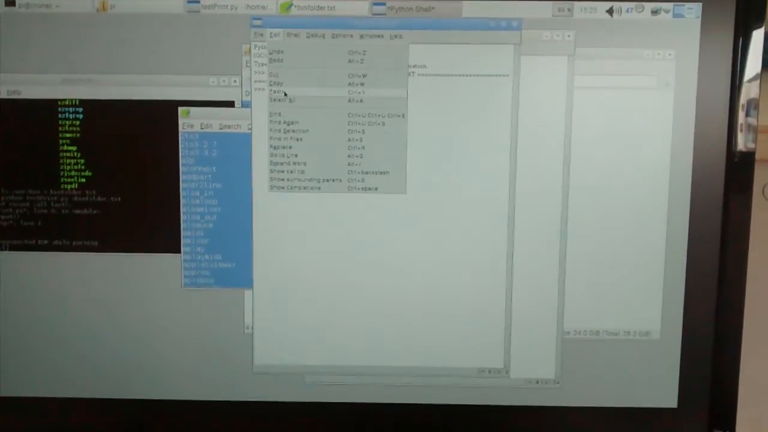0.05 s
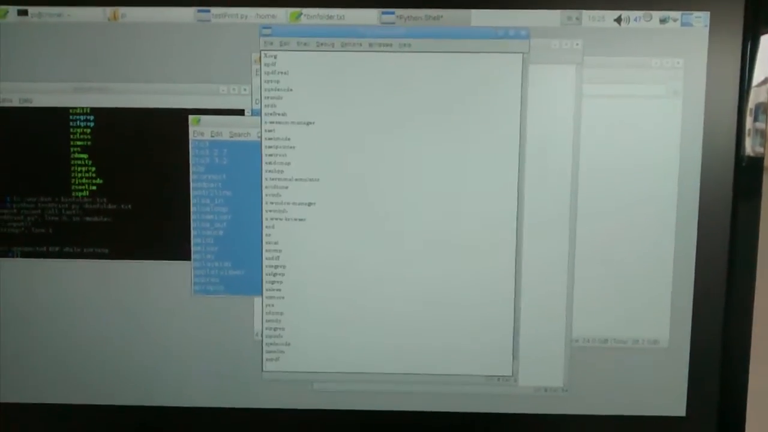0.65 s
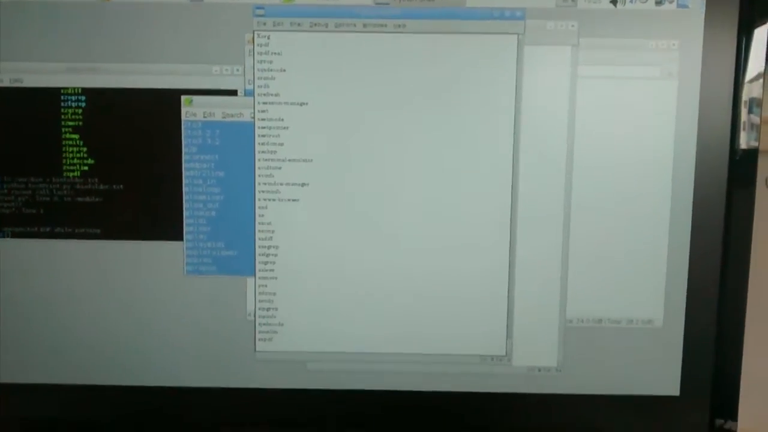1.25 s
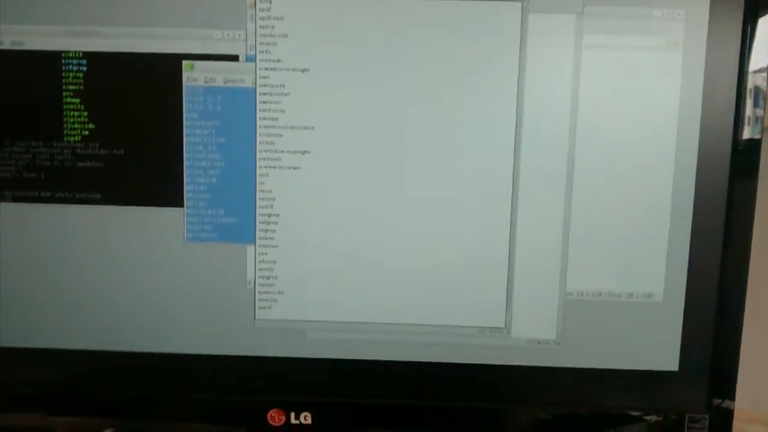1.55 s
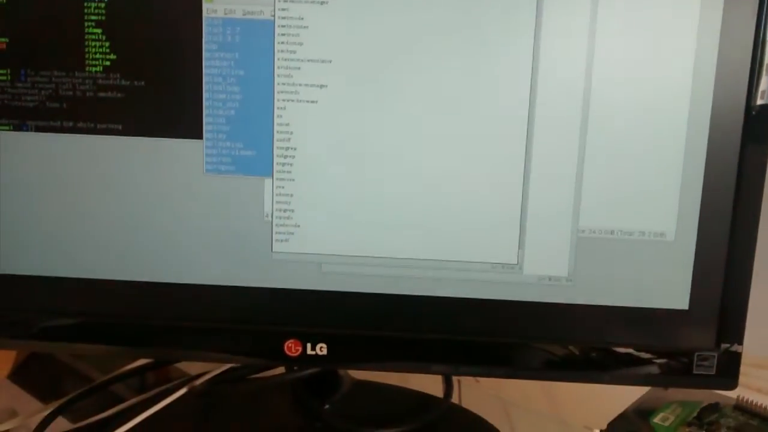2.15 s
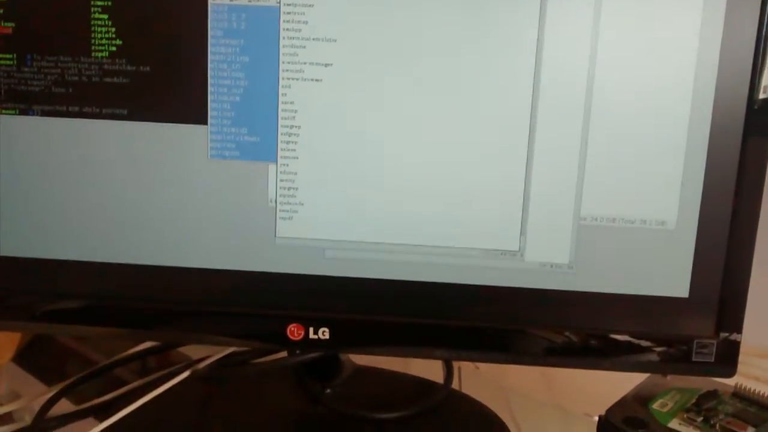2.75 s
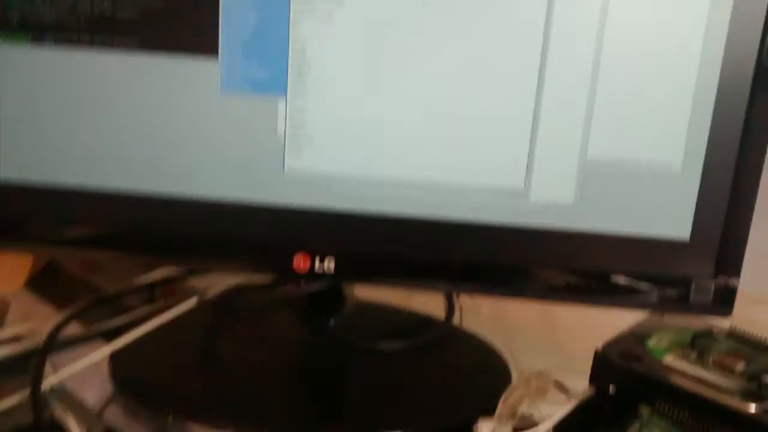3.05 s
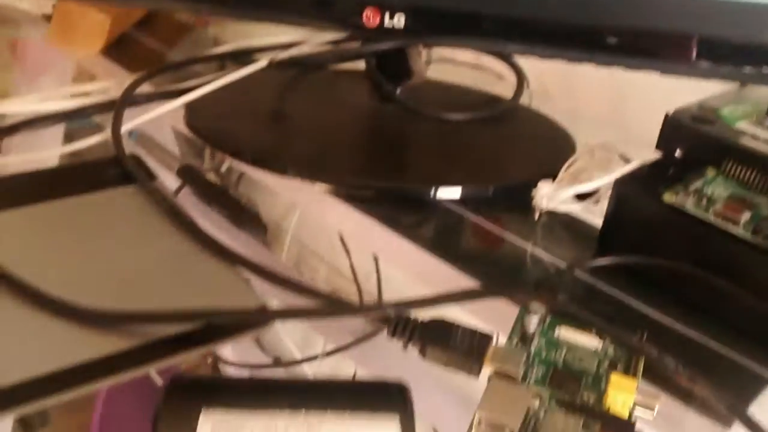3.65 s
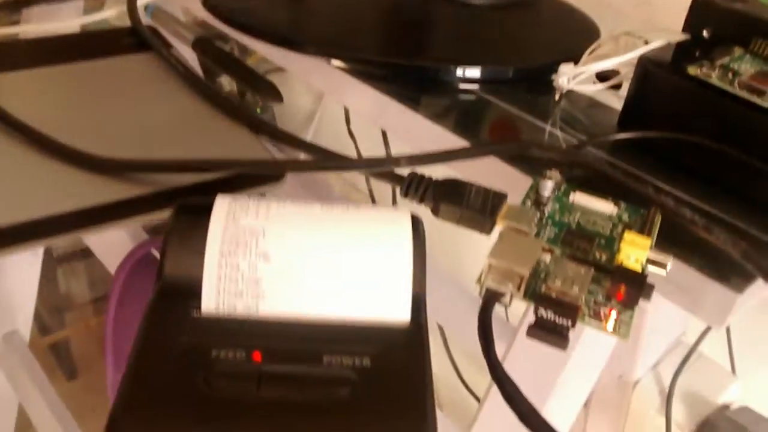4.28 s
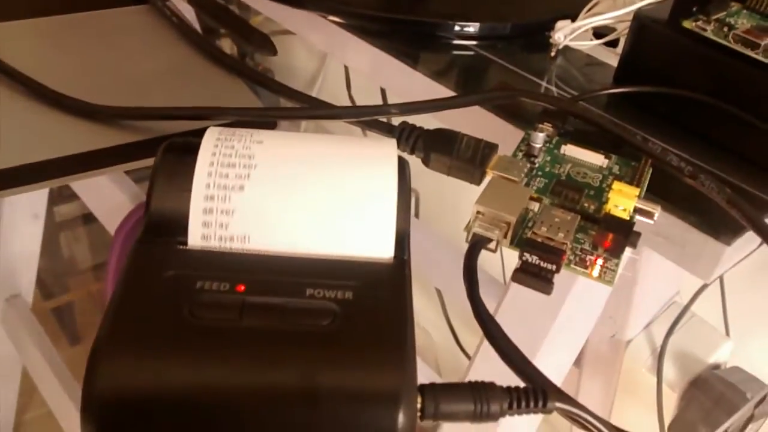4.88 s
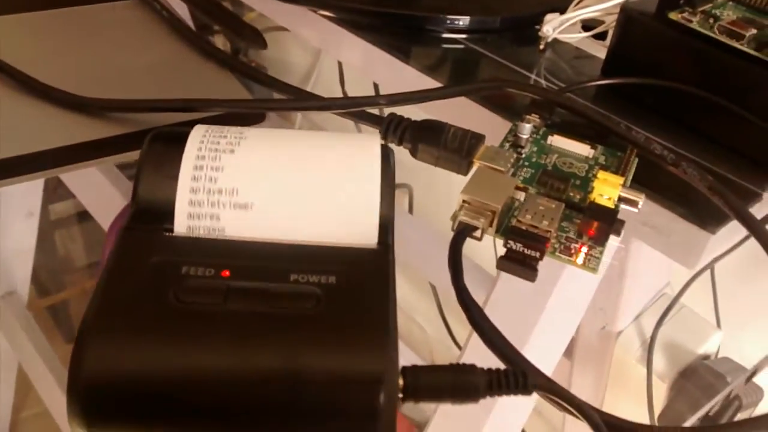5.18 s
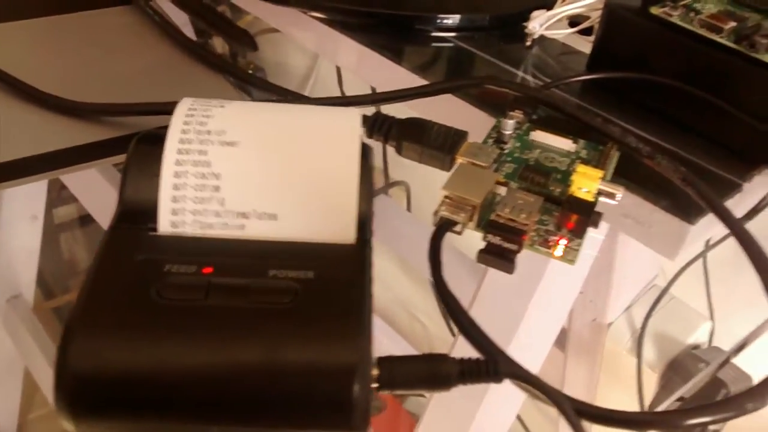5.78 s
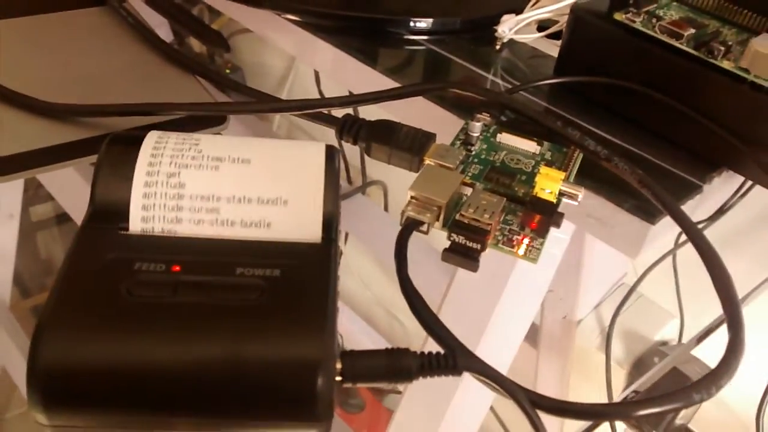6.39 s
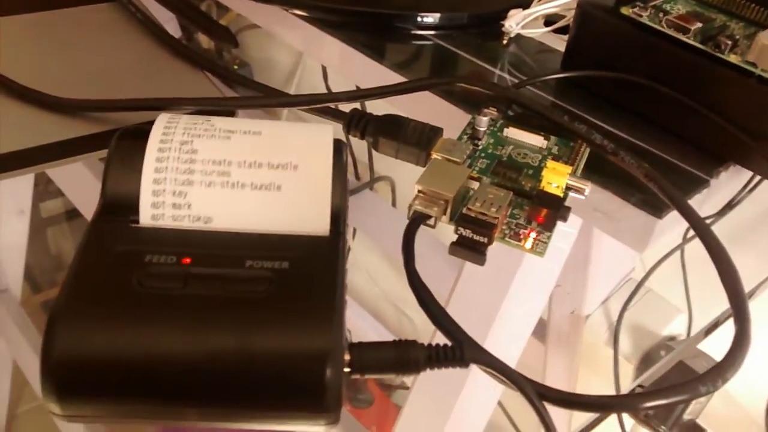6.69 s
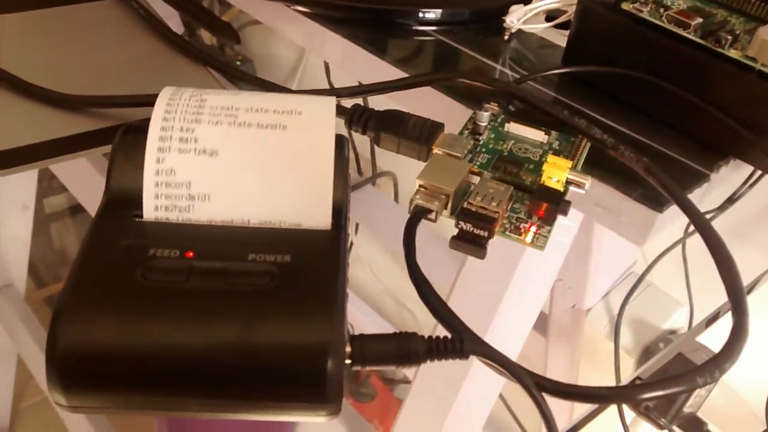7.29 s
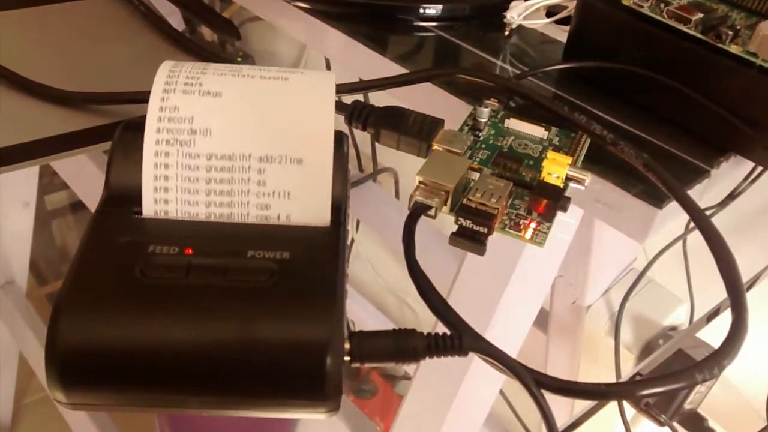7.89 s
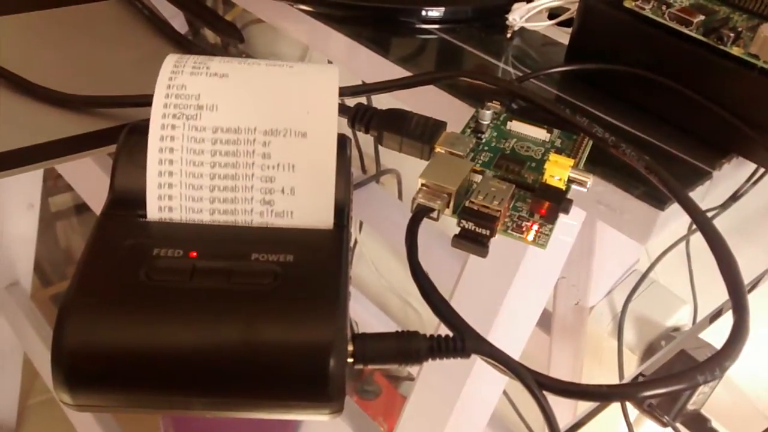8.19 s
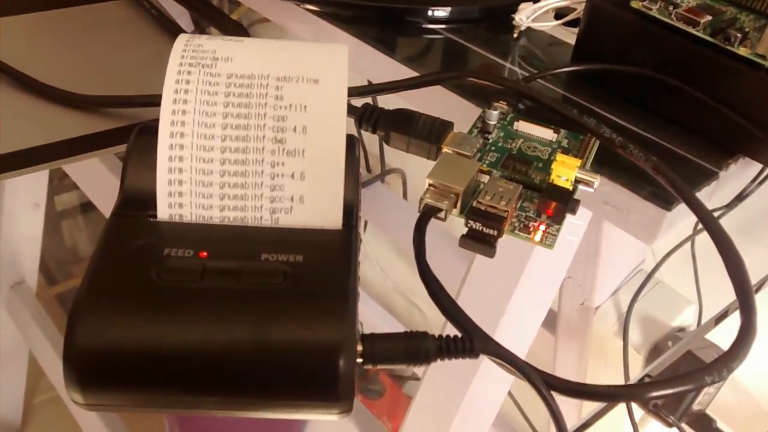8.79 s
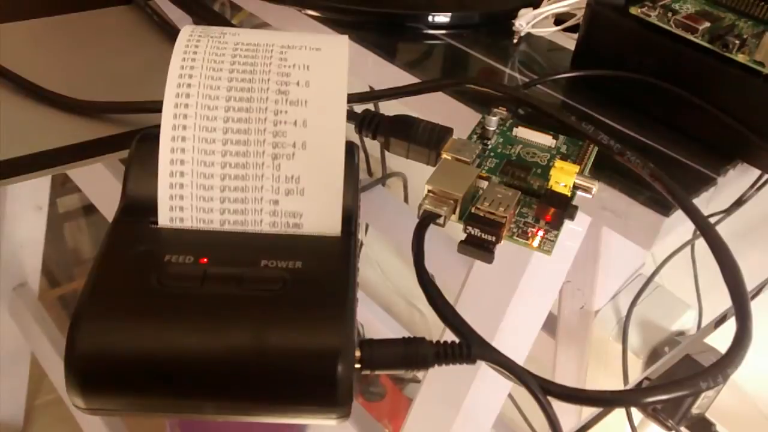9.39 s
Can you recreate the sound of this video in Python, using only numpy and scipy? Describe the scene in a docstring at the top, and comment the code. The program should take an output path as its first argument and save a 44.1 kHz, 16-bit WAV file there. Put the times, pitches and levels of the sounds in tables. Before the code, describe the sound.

A faint mouse click, then a small receipt printer whirs and buzzes steadily as it feeds rasping paper in a quiet room.

```python
"""A desk in a quiet room, heard on the two microphones of a hand-held phone. A mouse clicks, then a small
thermal receipt printer starts with a knock and feeds paper steadily. Its stepper motor sings at fixed
multiples of the shaft speed, the 1 kHz tone swelling and dipping about every 0.8 s; every jerk rattles
the gears and rasps the paper. The phone swings down to the printer and creeps in from 32 to 22 cm; its
stereo is widened by subtracting from each microphone a delayed copy of the other."""
import sys
import numpy as np
from scipy import signal
from scipy.fft import rfft, irfft, next_fast_len
from scipy.io import wavfile
from scipy.ndimage import map_coordinates

SR = 44100
rng = np.random.default_rng(int(sys.argv[2]) if len(sys.argv) > 2 else 0)


def store_pcm(level_fs):
    """Save levels as 16-bit WAV."""
    pcm = np.round(np.clip(level_fs, -1, 1) * 32767).astype(np.int16)
    wavfile.write(sys.argv[1], SR, np.atleast_2d(pcm).T)


N = 416304
TIME = np.arange(N) / SR


def amp(db):
    """Decibels to gain."""
    return 10 ** (np.asarray(db) / 20)


def unit(x):
    """Scale to rms 1."""
    return x / np.sqrt(np.mean(x ** 2) + 1e-20)


def along(points, hz):
    """Read rows of frequency and value at hz, on a log frequency axis."""
    freqs, values = np.transpose(points)
    return np.interp(np.log(hz + 1), np.log(freqs), values)


def curves(rows):
    """One value per sample for each column after the time."""
    times, *columns = np.transpose(rows)
    return [np.interp(TIME, times, column) for column in columns]


def wobble(rate):
    """A smooth random curve, rate knots a second."""
    return map_coordinates(rng.standard_normal(int(N * rate / SR) + 4), [TIME * rate])


def filtered(x, response):
    """x through a complex response of frequency."""
    size = next_fast_len(N + SR // 2)
    return irfft(rfft(x, size) * response(np.fft.rfftfreq(size, 1 / SR)), size)[..., :N]


def coloured(x, spectrum):
    """x shaped by rows of frequency in Hz and gain in dB, at rms 1."""
    return unit(filtered(x, lambda hz: amp(along(spectrum, hz))))


def gliding_band(x, hz, width_hz, order):
    """x through a pass band whose centre follows hz, at rms 1; a higher order gives steeper sides."""
    carrier = np.exp(2j * np.pi * np.cumsum(hz) / SR)
    lowpass = signal.butter(order, width_hz / 2, fs=SR, output="sos")
    return unit((carrier * signal.sosfilt(lowpass, x / carrier)).real)


def room_tone():
    """The steady dull hum of the room, with microphone hiss on top."""
    # Each row: frequency in Hz, relative level in dB.
    spectrum = [(12, -1), (30, 2), (60, 4.5), (150, 0), (350, -1), (700, -8), (1300, -15), (2400, -16),
                (3200, -14), (5000, -18.5), (9000, -19), (15000, -21)]
    # How alike the two microphones hear it. Each row: frequency in Hz, coherence.
    coherence = [(60, 0), (250, 0.38), (600, 0.36), (1300, 0), (3000, 0.016)]
    spread = lambda hz: np.arccos(np.clip(along(coherence, hz), -1, 1)) / 2
    noise = rng.standard_normal((2, N))
    mid, side = filtered(noise, lambda hz: np.array([np.cos(spread(hz)), np.sin(spread(hz))]))
    return amp(-56.5 + 0.49 * wobble(7.5)) * coloured(np.array([mid + side, mid - side]), spectrum)


def struck(blows, modes, crack, crack_t60):
    """Each blow rings the modes under a short crack of noise."""
    out, t = np.zeros(N), np.arange(SR // 5) / SR
    ring = sum(amp(db - 60 * t / t60) * np.sin(2 * np.pi * hz * t) for hz, db, t60 in modes)
    for start_s, db in blows:
        burst = crack * amp(-60 * t / crack_t60) * rng.standard_normal(len(t))
        out[round(start_s * SR):][:len(t)] += amp(db) * (ring + burst)
    return out


def mouse_click():
    """A mouse button snaps down, bounces and is let go softly, a little to the left."""
    # Each row: contact time in seconds, relative level in dB.
    contacts = [(.1625, -40.5), (.1642, -36.5), (.1745, -47), (.248, -57)]
    # Each row: frequency in Hz, relative level in dB, seconds to fall 60 dB.
    button_modes = [(3280, -7, .016), (3560, 0, .014), (3820, -6, .009), (4710, -18, .01),
                    (6300, -15, .005), (10200, -13, .006)]
    snap = struck(contacts, button_modes, crack=0.23, crack_t60=0.0077)
    # So small a part radiates little midrange.
    click = filtered(snap, lambda hz: 1 - 1 / (1 + (hz / 2400) ** 4))
    return click * amp([[-3], [-7]]) + amp(-5) * echoes(click, room_t60=.28, desk_share=.15)


def echoes(x, room_t60, desk_share, desk_t60=.04):
    """Quick reflections off the desk and a room tail, unrelated at the two microphones."""
    t = np.arange(SR // 2) / SR
    desk, room = unit(amp(-60 * t / desk_t60)), unit(amp(-60 * t / room_t60))
    decay = np.sqrt(desk_share * desk ** 2 + (1 - desk_share) * room ** 2)
    tail = decay * rng.standard_normal((2, len(t)))
    tail /= np.linalg.norm(tail, axis=1, keepdims=True)
    return signal.fftconvolve(x[None], tail, axes=1)[:, :N]


def starting_knock():
    """The gears take up their slack and ring the printer's housing."""
    # Each row: start in seconds, relative level in dB.
    blows = [(2.8487, -40), (2.8512, -39), (2.8535, -39.5)]
    # Each row: frequency in Hz, relative level in dB, seconds to fall 60 dB.
    housing_modes = [(885, -2, 0.02), (990, -7, 0.012), (1340, -7, 0.011), (3460, -11, 0.016)]
    return struck(blows, housing_modes, crack=.05, crack_t60=0.011)


def heard_db(db, away_db, closeness, swing=0, turn_s=0.63):
    """A part's level: offset until the phone turns to it, rising as it nears, swaying with the roller."""
    # Phone to printer. Each row: time in seconds, distance in metres.
    distance = [(4.0, 0.32), (6.8, 0.31), (8.2, 0.24), (9.44, 0.22)]
    turn_start_s = 3.36
    load_peak_s, roller_turn_s = 3.065, 0.8  # the slightly eccentric roller presses hardest once a turn
    away = 1 - np.clip((TIME - turn_start_s) / turn_s, 0, 1)
    metres, = curves(distance)
    load = 1 + swing * np.cos(2 * np.pi * (TIME - load_peak_s) / roller_turn_s)
    return db + away_db * away + 20 * np.log10(load * (metres[0] / metres) ** closeness)


def surge_db(swing=0.43, swell_s=0.8):
    """Level of the 1 kHz tone: it swells and dips about every 0.8 s, each swell with its own strength."""
    # Each row: crest time in seconds, level in dB about which the tone swings.
    surges = [(3.44, -63), (4.2, -59.5), (5.0, -58), (5.82, -59.5), (6.6, -61.5), (7.41, -59),
              (8.19, -57.3), (8.97, -56.5), (9.6, -52)]
    crests, db = np.transpose(surges)
    cycles = np.interp(TIME, crests, np.arange(len(crests)))
    cycles += (TIME - np.clip(TIME, crests[0], crests[-1])) / swell_s
    return np.interp(TIME, crests, db) + 20 * np.log10(1 + swing * np.cos(2 * np.pi * cycles))


def motor_tones(angle, waver_db=1.33, flutter_db=3.0):
    """Tones locked to the shaft: coil hum, its whining overtone, 20 steps a turn and fluttering gears."""
    # The hum, and its octave that comes and goes. Each row: time in seconds, relative level in dB.
    hum_levels = [(2.87, -73), (3.41, -74), (3.54, -63), (3.65, -65.5), (4.37, -61.5), (4.89, -67.5),
                  (5.11, -57), (5.33, -63.5), (5.97, -61.5), (6.34, -66.5), (7.63, -63.5), (7.76, -58),
                  (8.16, -63.5), (9.42, -60.5)]
    octave_levels = [(2.87, -76), (2.96, -59), (3.11, -57.5), (3.6, -88), (3.71, -59.5), (4.46, -74),
                     (4.71, -59), (4.95, -83), (5.39, -62), (5.53, -77), (5.59, -64), (7.87, -70.5),
                     (8.51, -66.5), (8.69, -74), (9.09, -62.5), (9.42, -69)]
    # Gear whine. Each row: multiple of the shaft speed, relative level in dB.
    gear_orders = [(13, -65), (16, -73), (18, -69.5), (19, -80), (21, -65), (24, -78), (25, -71), (26, -69),
                   (29, -69), (30, -71), (31, -80), (34, -73), (35, -75), (37, -75), (39, -75), (40, -66),
                   (42, -77), (55, -72), (72, -74), (76.2, -71), (80, -74), (81.2, -68), (100, -78),
                   (120, -82)]
    tone = lambda order: np.sqrt(2) * np.sin(order * angle + rng.uniform(0, 2 * np.pi))
    hum = amp(curves(hum_levels)[0] + 4) * tone(order=5)
    octave = amp(curves(octave_levels)[0]) * tone(order=10)
    whine_db = heard_db(-56, away_db=0.3, closeness=0.7, swing=0.21)
    whine = amp(whine_db + waver_db * wobble(12)) * tone(order=15)
    steps = amp(surge_db() + waver_db * wobble(9)) * tone(order=20)
    gears = sum(amp(db + flutter_db * wobble(8)) * tone(order) for order, db in gear_orders)
    gears *= amp(heard_db(-4, away_db=-6, closeness=1.8, turn_s=1.3))
    return hum + octave + whine + steps + gears


def jerks(angle, fall_db, tooth_db, scatter_db):
    """Noise bursts that start sharply and fade: 5 coil pulls per turn, swayed by 8 pinion teeth."""
    since_pull = (5 * angle / (2 * np.pi)) % 1
    db = -fall_db * since_pull + tooth_db * np.cos(8 * angle) + scatter_db * wobble(150)
    return amp(db) * rng.standard_normal(N)


def taps(angle, tooth_db, scatter_db, late_s=.0003):
    """One tiny impact just after each coil pull, hardest when a tooth is engaging."""
    pulls = np.flatnonzero(np.diff(np.floor(5 * angle / (2 * np.pi))) > 0)
    size, lateness = rng.standard_normal((len(pulls), 2)).T
    strength = amp(tooth_db * np.cos(8 * angle[pulls]) + scatter_db * size)
    landings = pulls + np.round(np.abs(lateness) * late_s * SR).astype(int)
    return np.bincount(landings, strength, N)[:N]


def case_rattle(angle):
    """The motor's jerks shake a midrange rattle out of the case."""
    # Each row: frequency in Hz, relative level in dB.
    spectrum = [(100, -45), (250, -5), (350, -2), (480, -12), (620, 2), (790, 4), (950, -2.5), (1200, -4),
                (1400, -4.5), (1700, -7), (2400, -18.5), (5000, -95)]
    rattle = coloured(jerks(angle, fall_db=10, tooth_db=1.5, scatter_db=1.3), spectrum)
    return amp(heard_db(-55.5, away_db=-0.8, closeness=1, swing=0.078)) * rattle


def gear_chatter(angle):
    """The gear teeth grind and clack at every pull."""
    # Each row: frequency in Hz, relative level in dB.
    spectrum = [(600, -52), (1300, -39), (1650, -16), (2000, 6.5), (2350, -8), (2800, -0.5), (3300, -3.5),
                (4500, -15), (8000, -41)]
    # Each row: time in seconds, relative level in dB.
    levels = [(2.9, -70), (4.3, -68), (5.1, -63.5), (5.9, -59.5), (6.3, -65), (7.3, -60.5), (8.3, -56),
              (9.4, -55)]
    grind = unit(jerks(angle, fall_db=21, tooth_db=7, scatter_db=1.5))
    clacks = unit(taps(angle, tooth_db=2.5, scatter_db=4))
    return amp(curves(levels)[0]) * coloured(grind + 1.3 * clacks, spectrum)


def frame_ring(angle):
    """Tiny impacts ring the metal frame of the print mechanism."""
    # Each row: resonance in Hz, width in Hz, relative level in dB.
    modes = [(2000, 250, -16), (2850, 300, -15), (3540, 180, 2), (3980, 160, -9), (4290, 200, 3),
             (4650, 300, -6), (4950, 350, -10)]
    metal = lambda hz: sum(amp(db) * 1j * hz * width / (centre ** 2 - hz ** 2 + 1j * hz * width)
                           for centre, width, db in modes)
    ring = unit(filtered(taps(angle, tooth_db=-0.5, scatter_db=3, late_s=.0004), metal))
    return amp(heard_db(-59.5, away_db=3.5, closeness=0.67, swing=0.19)) * ring


def paper_hiss(angle, beam_hz=7160):
    """Paper drags over the print head; the top beams narrowly and opens up later as the phone turns."""
    # Each row: frequency in Hz, relative level in dB.
    spectrum = [(1000, -32), (2500, -17), (3000, -11), (3500, -5), (3900, -2), (4300, 0), (4800, 2),
                (5400, -1), (6300, -3), (7200, -4.5), (8200, -8), (9200, -9), (11500, -10.8), (13000, -18),
                (15000, -20)]
    hiss = coloured(jerks(angle, fall_db=9, tooth_db=3, scatter_db=.4), spectrum)
    top = filtered(hiss, lambda hz: 1 - 1 / (1 + (hz / beam_hz) ** 10))
    body_db = heard_db(-53.8, away_db=-15.5, closeness=0.59, turn_s=0.2)
    top_db = heard_db(-53.5, away_db=-10.5, closeness=0, turn_s=1.1)
    return amp(body_db) * (hiss - top) + amp(top_db) * top


def paper_slips(angle):
    """The paper jumps forward once per coil pull: an even tick and a short drag."""
    ticks = unit(taps(angle, tooth_db=2, scatter_db=.8))
    drag = unit(jerks(angle, fall_db=12, tooth_db=2, scatter_db=.4))
    return coloured(.6 * ticks + drag, [(1500, -46), (2400, -18), (2800, 0), (8500, 0), (11000, -10)])


def paper_strip(angle, ring_width_hz=500, rustle_width_hz=2250):
    """The slips ring the free strip, which rustles broadly above its lowest mode."""
    # It rings lower as it lengthens, then springs back as it curls over.
    # Each row: time in seconds, pitch in Hz, relative levels of ring and rustle in dB.
    strip = [(3.15, 6400, -77, -80), (3.36, 6300, -62, -67), (3.5, 4700, -65, -56.5),
             (3.62, 3960, -59, -56), (4.05, 3670, -58.5, -54.5), (4.5, 3400, -56.5, -56.5),
             (4.92, 3370, -53.5, -56), (5.35, 3430, -55.5, -55), (5.58, 3050, -57.5, -56.5),
             (5.92, 2800, -54.5, -55.5), (6.07, 2840, -56, -53), (6.13, 3560, -57, -55),
             (6.5, 3500, -56, -55), (7.1, 3500, -58, -56.5), (9.4, 3570, -65.5, -55.5)]
    # Bending modes, the higher ones more damped. Each row: multiple of the pitch, relative level in dB.
    modes = [(1, 0), (1.62, -5), (2.4, -8.5)]
    pitch_hz, ring_db, rustle_db = curves(strip)
    slips = paper_slips(angle)
    ring = sum(amp(db) * gliding_band(slips, ratio * pitch_hz, ratio * ring_width_hz, order=2)
               for ratio, db in modes)
    rustle = gliding_band(paper_slips(angle), pitch_hz + rustle_width_hz / 2, rustle_width_hz, order=6)
    return amp(ring_db) * ring + amp(rustle_db) * rustle


def tear_bar_scrape(angle):
    """The paper scrapes over the tear bar in surges."""
    # Each row: time in seconds, resonance in Hz, relative level in dB.
    surges = [(3.45, 3880, -68), (3.85, 3780, -56), (4.35, 3780, -50.3), (4.6, 3780, -53),
              (4.78, 3750, -56.5), (5.08, 3780, -55.5), (5.26, 3730, -48.5), (5.5, 3750, -60),
              (6.03, 4150, -56), (6.14, 3800, -50), (6.32, 3630, -48.3), (6.7, 3600, -53.5),
              (7.05, 4020, -57.5), (8.1, 4130, -58.5), (9.4, 4050, -56)]
    hz, db = curves(surges)
    return amp(db) * gliding_band(paper_slips(angle), hz, width_hz=780, order=2)


def drifting_echoes(x, drift_s=0.9):
    """One pattern of reflections fades into the next as the phone moves."""
    # Colour of the reflections. Each row: frequency in Hz, gain in dB.
    colour = [(250, 6.5), (700, -11.5), (1400, -1.5), (2500, 2), (3500, -0.5), (5000, -5.5), (8000, 1),
              (13000, 2.5)]
    hop = round(drift_s * SR)
    out, padded = np.zeros((2, N + 2 * hop + SR)), np.pad(x, (0, 2 * hop))
    fade = np.sin(np.pi * np.arange(2 * hop) / (2 * hop))
    for start in range(0, N, hop):
        piece = echoes(fade * padded[start:start + 2 * hop], room_t60=.3, desk_share=.35)
        out[:, start:start + piece.shape[1]] += piece
    return filtered(out[:, :N], lambda hz: amp(along(colour, hz)))


def at_microphones(direct, reflections):
    """The printer reaches the microphones slightly apart in time; the phone's body hides the right one."""
    # Case and paper radiate from different spots. Each row: frequency in Hz, left's lead in seconds.
    lead = [(250, -.0001), (500, .00011), (750, .0001), (1200, .00015), (2550, .000195), (5000, .00016)]
    # Each row: frequency in Hz, left level minus right in dB.
    shade = [(250, 3), (500, 5.5), (750, 5), (1000, 7), (1400, 9), (2000, 9.5), (2600, 6.5), (3500, 2.5),
             (4400, -0.5), (5200, 0), (6200, 6.5), (8000, 11), (9200, 5.5), (11000, 1.5)]
    pair = filtered(direct, lambda hz: np.exp(1j * np.pi * np.outer([1, -1], hz * along(lead, hz))))
    return filtered(pair + reflections, lambda hz: amp(np.outer([1, -1], along(shade, hz)) / 2))


def printer(start_s=2.85, shaft_hz=49.525):
    """The printer on the desk: a knock, then one shaft drives the tones, the rattles and the paper."""
    angle = 2 * np.pi * shaft_hz * TIME + 0.0095 * wobble(30)  # steady step clock, some play in the rotor
    running = np.clip((TIME - start_s) / 0.005, 0, 1)
    tones = running * motor_tones(angle)
    rattles = case_rattle(angle) + gear_chatter(angle) + frame_ring(angle)
    paper = amp(0.21 * wobble(22)) * (paper_hiss(angle) + paper_strip(angle) + tear_bar_scrape(angle))
    rasp = running * amp(-3) * (rattles + paper)
    knock = starting_knock()
    reflections = drifting_echoes(rasp + 0.31 * knock + amp(-20) * tones)
    return at_microphones(tones + rasp + knock, reflections)


def scene():
    """Everything that reaches the two microphones."""
    return printer() + mouse_click() + room_tone()


def record(dry, delay_s=1 / 2550, top_hz=15400):
    """The phone's stereo widener subtracts the delayed opposite channel; the highest treble is cut."""
    # Each row: frequency in Hz, share of the opposite microphone subtracted.
    shares = [(100, .55), (700, .83), (1300, .88), (2250, .83), (2550, .96), (2850, .83), (3800, .45),
              (5000, .15), (15000, .2)]
    opposite = filtered(dry[::-1], lambda hz: along(shares, hz) * np.exp(-2j * np.pi * hz * delay_s))
    return filtered(dry - opposite, lambda hz: hz < top_hz)


dry = scene()
out = record(dry)
store_pcm(out)
```